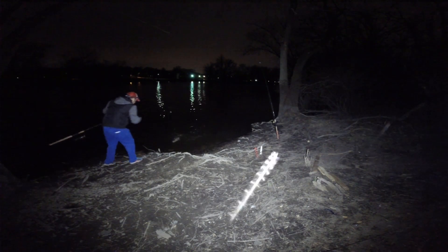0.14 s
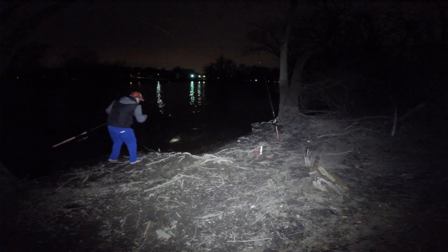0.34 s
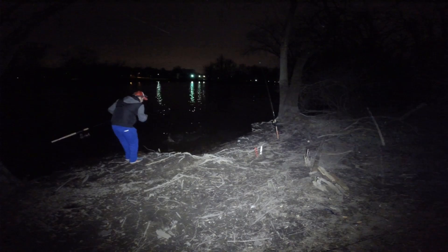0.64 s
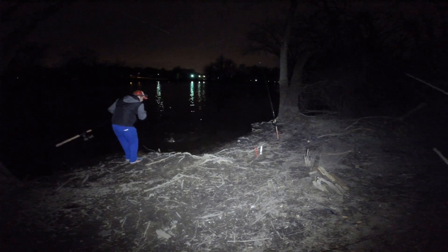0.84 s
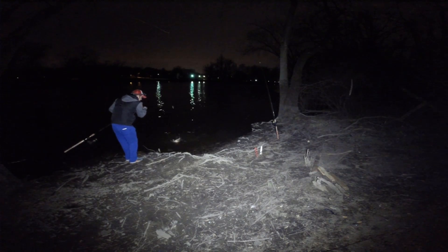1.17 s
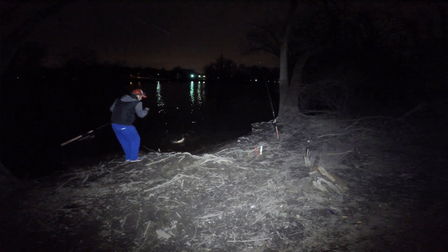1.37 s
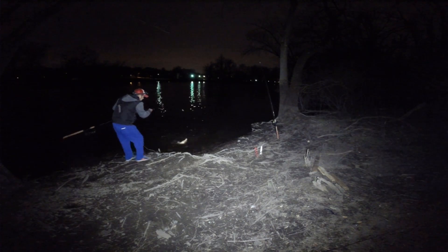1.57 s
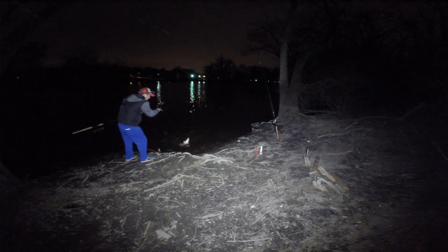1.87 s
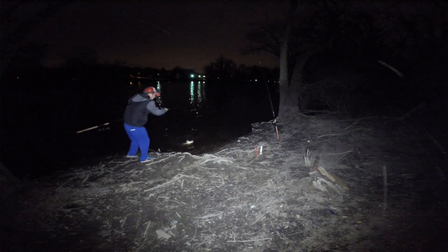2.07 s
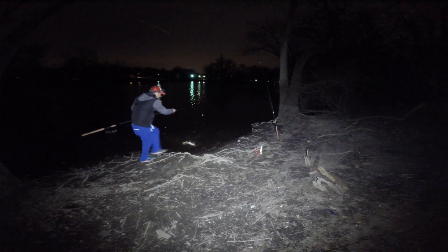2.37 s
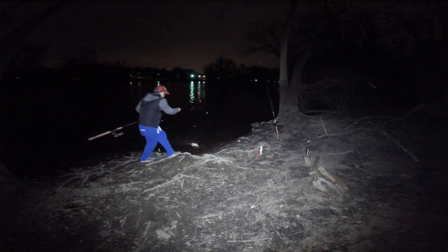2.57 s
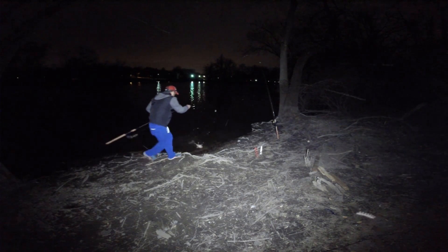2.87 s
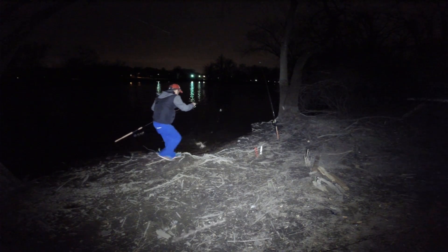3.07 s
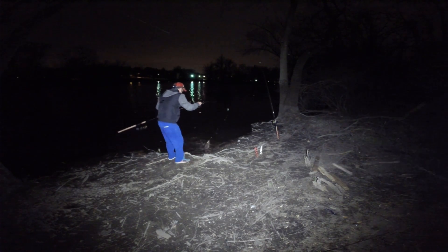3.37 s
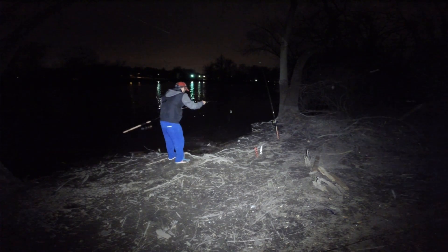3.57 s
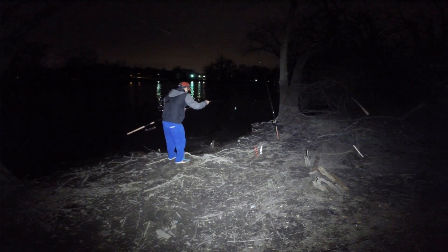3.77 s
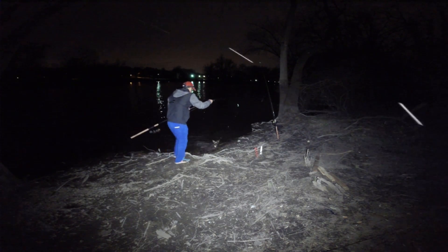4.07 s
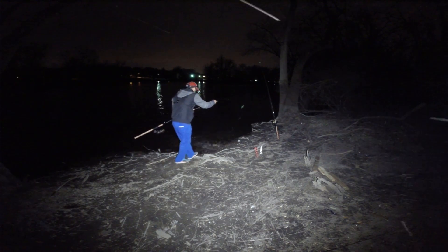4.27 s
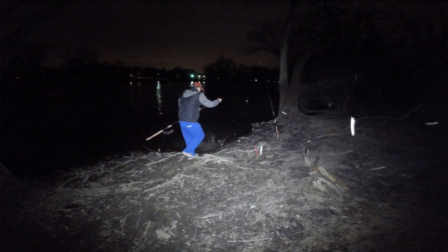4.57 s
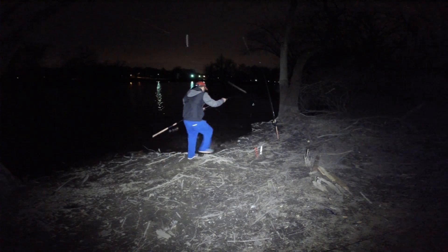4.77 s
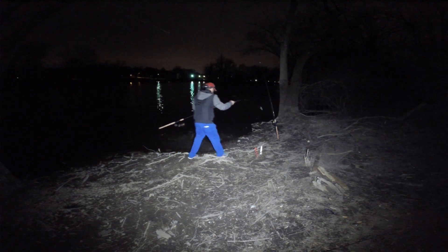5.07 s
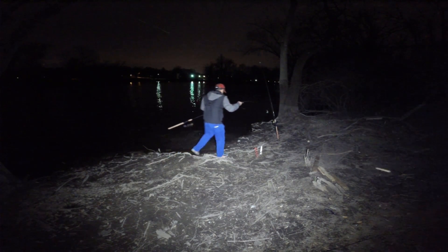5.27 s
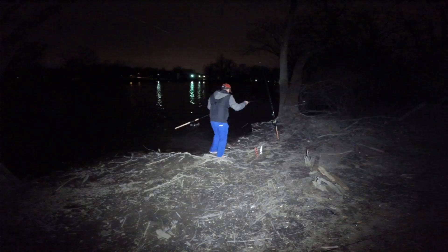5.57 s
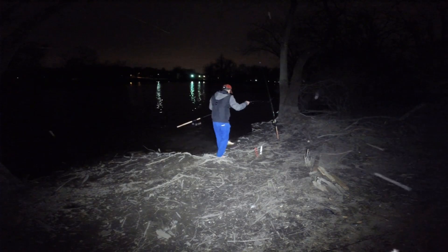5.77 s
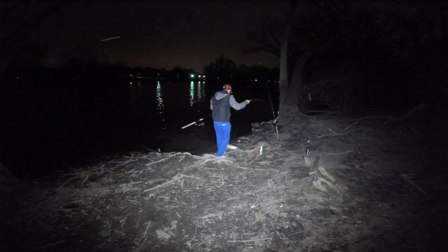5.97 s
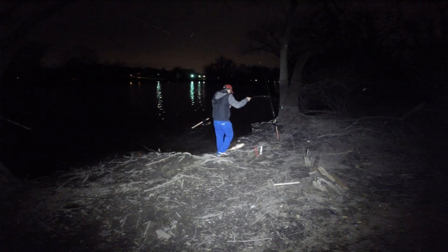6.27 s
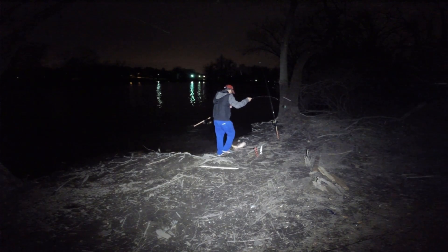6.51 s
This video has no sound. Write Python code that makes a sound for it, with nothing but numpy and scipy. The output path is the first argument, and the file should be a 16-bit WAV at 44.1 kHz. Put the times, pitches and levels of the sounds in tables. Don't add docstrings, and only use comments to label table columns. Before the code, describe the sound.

Feet rustle and crunch through dry brush on a quiet night riverbank, twigs snapping harder later while a tiny tackle bell jingles over distant traffic hum.

```python
import sys
import numpy as np
from scipy import signal
from scipy.io import wavfile
from scipy.ndimage import uniform_filter1d

SR = 44100
rng = np.random.default_rng(int(sys.argv[2]) if len(sys.argv) > 2 else 0)


def dump_mix(stems):
    frames = np.atleast_2d(stems).T
    limited = np.clip(frames, -1, 1)
    pcm = np.round(limited * 32767).astype(np.int16)
    wavfile.write(sys.argv[1], SR, pcm)


def volts_from_decibels(level):
    exponent = np.asarray(level, float) / 20
    return 10 ** exponent


N = 292824

# (frequency [Hz], level [dB])
FIBRE_COLOUR = [(530, -27.5), (900, -8), (1480, -15.5), (1840, -7.5), (2390, -13), (2800, -16.5),
                (3250, -27), (3620, -26), (4030, -9.5), (4380, -18), (4760, -13.5), (6120, -15),
                (7230, -24.5), (10600, -16), (12800, -35), (14800, -46), (15500, -24.5)]


def evened(x):
    return x / np.sqrt(np.mean(x ** 2) + 1e-20)


def peaked(x, db):
    return volts_from_decibels(db) * x / (abs(x).max() + 1e-20)


def read(points, hz):
    f, value = np.transpose(points)
    return np.interp(np.log(hz + 1), np.log(f + 1), value)


def curve(rows, column):
    rows = np.array(rows)
    return np.interp(np.arange(N) / SR, rows[:, 0], rows[:, column])


def add(mix, s, sound):
    part = mix[round(s * SR):][:len(sound)]
    part += sound[:len(part)]


def smoothed(x, rows, columns):
    return uniform_filter1d(uniform_filter1d(x, size=rows, axis=0), size=columns, axis=1)


def resonate(x, hz, width):
    return signal.lfilter(*signal.iirpeak(hz, hz / width, SR), x)


def rings(x, modes):
    return sum(volts_from_decibels(db) * resonate(x, hz, width) for hz, width, db in modes)


def coloured(x, spectrum):
    hz = abs(np.fft.fftfreq(4096, 1 / SR))
    log_gain = np.log(volts_from_decibels(np.maximum(read(spectrum, hz), -100)))
    taps = np.fft.ifft(np.exp(np.conj(signal.hilbert(log_gain)))).real[:2048]
    return signal.oaconvolve(x, taps)[:len(x)]


def grains(per_s, spread_db):
    size = volts_from_decibels(spread_db * np.minimum(rng.exponential(1, N), 5)) * rng.choice([-1, 1], N)
    return evened(size * (rng.random(N) < per_s / SR))


def burst(ms, rise, count):
    u = np.arange(count) / SR * 1000 / np.clip(ms, .3, 40)
    return u ** rise * np.exp(-u * 2)


def night_air(spectrum, level_db, patchy_db, flicker_db):
    frames, hz = N // 256 + 5, np.fft.rfftfreq(1024, 1 / SR)
    a, b, patches = rng.standard_normal((frames, 513, 3)).T
    patches = evened(smoothed(patches, 8, 8))
    flicker = evened(uniform_filter1d(rng.standard_normal(frames), size=6))
    gain_db = read(spectrum, hz)[:, None] + patchy_db * patches + flicker_db * flicker
    z = (a + 1j * b) * volts_from_decibels(gain_db)
    return volts_from_decibels(level_db) * evened(signal.istft(z, nperseg=1024, noverlap=768)[1][:N])


def traffic_hum():
    # (frequency [Hz], level [dB])
    hum_colour = [(8.8, -29), (15, -17), (27, -17), (64, 3.5), (107, -1), (135, -9.5), (191, -3.5),
                  (281, -7), (421, -10), (454, -10), (655, -1.5), (764, -15.5), (875, -19), (1290, -28),
                  (1500, -71), (1950, -73), (3300, -120)]
    return night_air(hum_colour, level_db=-50, patchy_db=0.32, flicker_db=-0.5)


def air_hiss():
    # (frequency [Hz], level [dB])
    hiss_colour = [(710, -5.5), (1200, -1), (1500, 0.5), (1940, -1.5), (3200, -7.5), (3730, -8.5),
                   (5200, -19), (5600, -11.5), (5970, -18.5), (7320, -15), (8230, -38), (8870, -29),
                   (11500, -29), (12000, -26), (13200, -22), (15500, -55)]
    return night_air(hiss_colour, level_db=-67, patchy_db=2.0, flicker_db=1.0)


def insects():
    # (frequency [Hz], width [Hz], level [dB])
    buzz_bands = [(2650, 360, 7.5), (8170, 430, 6), (9840, 510, 1.5), (11300, 450, 2)]
    # (time [s], level [dB])
    buzz_level = [
        (0, -72),
        (.395, -71),
        (.41, -78.5),
        (1.5, -78.5),
        (6.64, -78.5),
    ]
    buzz = evened(rings(rng.standard_normal(N), buzz_bands))
    return volts_from_decibels(curve(buzz_level, column=1)) * buzz


def whine():
    # (frequency [Hz], level [dB])
    tones = [(5610.6, -78), (11245, -82.5)]
    frame_hz, first_frame_s = 23.977, .0073
    t = np.arange(N) / SR
    place = ((t - first_frame_s) * frame_hz) % 1
    swell = np.clip((place - .62) / 0.15, 0, 1) * np.clip((1 - place) / 0.037, 0, 1)
    drift = 0.008 * np.cumsum(rng.standard_normal(N))
    both = sum(volts_from_decibels(db + 8.5) * np.sin(2 * np.pi * hz * t + (k + 1) * drift)
               for k, (hz, db) in enumerate(tones))
    return swell * both


def shaking_db():
    # (start [s], hold [s], level [dB])
    jolts = [(0.415, 0.073, -66), (0.576, 0.013, -78), (0.826, 0.03, -56), (0.953, .02, -68),
             (1.02, 0.018, -67), (1.154, 0.12, -68.5), (1.277, 0.092, -61), (1.373, 0.19, -64),
             (1.516, 0.092, -67), (1.657, 0.033, -58), (1.853, 0.022, -64.5), (2.413, 0.037, -74),
             (2.55, 0.13, -71), (2.752, 0.06, -65), (3.124, 0.022, -61), (3.235, 0.066, -59),
             (3.387, .3, -65), (3.785, 0.1, -55), (3.929, 0.079, -49), (4.085, 0.025, -60),
             (4.185, 0.085, -55), (4.393, 0.13, -50.5), (4.58, 0.25, -57.5), (4.907, 0.17, -52.5),
             (5.06, 0.51, -56.5), (5.695, 0.037, -52), (5.815, 0.0088, -55), (5.894, 0.18, -59.5),
             (6.181, 0.12, -47), (6.362, 0.25, -51.5)]
    still_db, rise_db_per_s, fall_db_per_s = -83, 700, 291
    t = np.arange(N) / SR
    coarse = t[::64]
    start, hold, db = np.transpose(jolts)[:, :, None]
    rise = rise_db_per_s * np.maximum(start - coarse, 0)
    fall = fall_db_per_s * np.maximum(coarse - start - hold, 0)
    strongest = (db - rise - fall).max(axis=0)
    return np.interp(t, coarse, np.maximum(strongest, still_db))


def scratches(hz, width):
    puffs = signal.oaconvolve(abs(grains(200, 3)), burst(2.2, rise=0.5, count=1500))[:N]
    puffs = puffs * rng.standard_normal(N)
    return evened(resonate(resonate(puffs, hz, width), hz, width))


def brush():
    # (time [s], dry rustle level [dB], low crunch level [dB])
    tread = [(0.0, -63.5, -55.5), (0.41, -68.5, -49.5), (1.1, -68, -54), (1.4, -67.5, -46), (1.8, -68, -55),
             (2.94, -67, -51), (3.5, -65, -49.5), (4.15, -64, -50.5), (4.33, -60, -50.5),
             (4.46, -56.5, -45), (4.75, -61, -56.5), (5.1, -60.5, -52), (5.4, -67.5, -50),
             (5.86, -67.5, -54), (6.45, -59.5, -51), (6.64, -63.5, -48.5)]
    # (frequency [Hz], level [dB])
    crunch_colour = [(88, -60.5), (150, -5), (294, -10.5), (526, -3.5), (690, 3.5), (796, -5), (905, -6.5),
                     (1100, -16), (1390, -24), (2130, -20), (3300, -42), (4290, -89), (7260, -120)]
    # (frequency [Hz], width [Hz], level [dB])
    stalks = [(4290, 610, 1.5), (4570, 410, -0.5), (5080, 420, -0.5)]
    # (frequency [Hz], level [dB])
    dust_colour = [(5000, -29), (6500, -2), (7500, -14), (9000, 0), (11000, -5), (13000, -11), (15500, -18)]
    clumps = volts_from_decibels(2.0 * evened(uniform_filter1d(rng.standard_normal(N), size=600)))
    rustle = evened(coloured(grains(3000, 2.6) * clumps, FIBRE_COLOUR))
    crunch = evened(coloured(grains(900, 0.78) * clumps, crunch_colour))
    scratch = sum(volts_from_decibels(db) * scratches(hz, width) for hz, width, db in stalks)
    fizz = evened(coloured(grains(3000, 2.5) * clumps, dust_colour))
    rustle_db, crunch_db = curve(tread, column=1), curve(tread, column=2)
    effort_db = 0.5 * shaking_db() + 0.8 * rustle_db
    return (volts_from_decibels(rustle_db - 3.5) * rustle + volts_from_decibels(crunch_db - 6.5) * crunch
            + volts_from_decibels(1.197 * effort_db + 24) * scratch + volts_from_decibels(1.36 * rustle_db + 12.5) * fizz)


def housing_knocks():
    # (time [s], level [dB], frequency [Hz], length [ms])
    knocks = [(0.41, -40, 557, 5.5), (0.584, -46, 687, 4.9), (0.607, -40, 677, 5), (1.299, -44.5, 730, 5.2),
              (2.141, -44, 750, 2.2), (2.043, -40.5, 650, 5), (0.085, -44, 670, 7.6),
              (2.734, -40, 646, 1.2), (3.088, -45.5, 594, 3), (3.283, -38.5, 594, 6.7),
              (3.444, -35.5, 530, 2.4), (3.504, -38, 610, 4.8), (3.532, -43, 641, 10),
              (3.972, -35.5, 513, 7.5), (3.9847, -26.5, 582, 4.8), (3.996, -40, 672, 5.1),
              (4.014, -40, 670, 5.8), (4.03, -28.5, 596, 1.8), (4.062, -41.5, 650, 1.5),
              (4.401, -39.5, 670, 1), (4.439, -36.5, 654, 4.1), (4.455, -36.5, 586, 7.3),
              (4.486, -31.5, 537, 3.7), (4.5, -31, 668, 4.7), (4.5167, -25.5, 670, 0.35),
              (4.845, -35, 592, 2.3), (4.858, -33, 664, 0.44), (4.868, -23, 662, 0.78),
              (4.9988, -23, 572, 0.83), (5.0035, -19.5, 639, 0.98), (5.3082, -40, 273, 2.1),
              (5.3098, -14.5, 655, 0.74), (6.19, -22, 574, 0.64)]
    # (frequency [Hz], width [Hz], level [dB])
    side_rings = [(392, 80, -7), (580, 60, -10), (640, 55, 5), (760, 120, -8)]
    out, t = np.zeros(N), np.arange(3000) / SR
    for (s, db, hz, ms), noise in zip(knocks, rng.standard_normal((len(knocks), 3000))):
        push = burst(ms, rise=0.84 + ms / 4, count=3000)
        knock = evened(resonate(push * np.sin(2 * np.pi * hz * t), hz, 114))
        knock = evened(resonate(knock, 370, 910))
        sides = rings((push + 0.08 * np.exp(-t / 0.006)) * noise, side_rings)
        sides = evened(resonate(resonate(sides, 480, 880), 414, 760))
        thump = evened(resonate(push, 252, 150))
        add(out, s, peaked(knock + 0.49 * sides + 0.25 / (1 + ms) * thump, db))
    return out


def twigs():
    # (time [s], level [dB], frequency [Hz])
    split_twigs = [(0.323, -50, 1060), (0.399, -51, 1920), (0.584, -51, 1740), (1.45, -60, 1360),
                   (1.3, -49, 1050), (1.325, -57, 2050), (2.142, -46.5, 950), (2.517, -52.5, 2200),
                   (2.521, -46.5, 1270), (2.618, -51, 1260), (3.088, -47.5, 1260), (1.095, -54.5, 1820),
                   (3.932, -43.5, 1040), (3.972, -43, 1600), (4.014, -46.5, 1570), (4.03, -34.5, 1480),
                   (4.261, -48, 2240), (4.401, -42, 1120), (4.437, -40, 940), (4.5, -51, 1100),
                   (4.516, -35.5, 1060), (4.67, -52, 1540), (4.8412, -46, 1900), (4.847, -39, 1960),
                   (4.847, -44, 2700), (4.863, -34, 2030), (4.862, -46, 2620), (4.901, -51, 1890),
                   (4.8696, -25.5, 1040), (4.973, -59, 1890), (4.998, -34, 1010), (4.9992, -35.5, 1760),
                   (5.3085, -28.5, 945), (5.309, -35, 1980), (5.3123, -37, 2700), (6.1894, -43, 1150),
                   (6.189, -30, 1870), (6.478, -53.5, 2180)]
    # (time [s], level [dB], frequency [Hz])
    small_stems = [(0.511, -58, 1850), (0.698, -56, 1700), (0.7312, -56, 1740), (1.221, -60, 1200),
                   (1.305, -50, 1290), (1.4047, -65, 1270), (1.5084, -64, 1580), (2.7334, -62, 2100),
                   (2.8868, -66, 1760), (2.9941, -59, 1170), (3.4501, -55, 2200), (3.5349, -57, 2040),
                   (3.563, -53, 1140), (3.7, -65, 1090), (3.7898, -55, 1140), (5.882, -58, 1090),
                   (6.126, -55, 2260), (6.341, -62, 2080), (6.3649, -51, 2070), (6.5852, -55, 1110)]
    # (time [s], level [dB], frequency [Hz])
    thick_stems = [
        (1.235, -50, 990),
        (1.388, -55, 850),
        (1.466, -58, 910),
        (1.526, -48, 910),
        (2.549, -48, 880),
        (6.163, -53, 910),
    ]
    splits = split_twigs + small_stems + thick_stems
    out, t = np.zeros(N), np.arange(3000) / SR
    for (s, db, hz), noise in zip(splits, rng.standard_normal((len(splits), 3000))):
        ms = 1.9 - .055 * (db + 48.5)
        split = burst(ms, rise=0.91, count=3000) * (noise + 2.3 * np.sin(2 * np.pi * hz * t))
        wood = evened(resonate(resonate(split, hz, 0.31 * hz), hz, 0.11 * hz))
        bark = resonate(split, 1930, 800) + 0.59 * resonate(split, 1150, 800)
        bark = evened(resonate(bark, 1730, 4100))
        bark_db = 2.5 - 0.19 * (db + 42)
        add(out, s, peaked(wood + volts_from_decibels(bark_db) * bark, db + 1.0))
    return out


def upper_rings(strokes, modes, hz):
    out = np.zeros(N)
    for (s, db), noise in zip(strokes, rng.standard_normal((len(strokes), 4000))):
        rattle = noise * burst(5.0, rise=0.18, count=4000)
        add(out, s, peaked(resonate(rings(rattle, modes), hz, 2500), db - 3.0))
    return out


def bell():
    # (time [s], ring level [dB], ring frequency [Hz], tick level [dB])
    clapper_strokes = [(0.468, -45, 4100, -58), (0.4875, -44, 4140, -52), (0.835, -47, 4140, -59),
                       (1.0213, -49.5, 4200, -68), (1.1453, -52, 4060, -50), (1.278, -46, 4060, -52),
                       (1.308, -42, 4180, -52), (1.386, -46, 4070, -58), (1.441, -41, 4040, -54),
                       (1.5247, -47, 4100, -56), (1.6765, -42, 4100, -56), (2.409, -50.5, 4150, -54),
                       (2.445, -56, 4130, -65), (2.571, -46, 4070, -69), (2.615, -64, 4050, -64),
                       (2.651, -54, 4140, -54), (2.68, -63, 4120, -62), (3.1107, -43, 4160, -68),
                       (3.223, -40, 4100, -52), (3.271, -59, 4000, -58), (3.32, -60, 4000, -60),
                       (3.401, -59, 4080, -58), (3.468, -60, 4060, -60), (3.5945, -45, 4180, -52),
                       (3.881, -70, 4080, -49), (3.942, -46, 4080, -49), (3.989, -38, 3960, -57),
                       (4.0821, -37.5, 4090, -57), (4.2645, -46, 4030, -54), (4.4038, -38, 4070, -59),
                       (4.453, -34.5, 4050, -40), (4.614, -41, 4000, -45), (4.9762, -40, 3920, -39),
                       (5.687, -50, 3910, -65), (6.1454, -41, 4200, -45), (6.243, -35, 3950, -58),
                       (6.279, -42.5, 4120, -45),
                       (0.415, -63, 4110, -67), (0.5143, -50, 4100, -62), (0.5831, -53, 4100, -58),
                    (0.8021, -63, 4060, -63), (0.9552, -58, 4030, -61), (1.1085, -54, 4000, -58),
                    (1.178, -61, 4200, -55), (1.5973, -60, 4000, -61), (1.6492, -63, 4020, -58),
                    (2.544, -52, 4170, -61), (2.7626, -61, 4020, -60), (2.8005, -56, 4120, -60),
                    (3.7199, -47, 4150, -58), (3.7713, -49, 4200, -60), (3.8277, -44, 3970, -55),
                    (4.117, -42, 4130, -60), (4.187, -45, 4100, -60), (4.3266, -50, 4130, -53),
                    (4.4997, -42, 3930, -58), (4.7097, -46, 4090, -58), (4.7712, -49, 4160, -54),
                    (4.803, -41, 4060, -60), (4.8336, -38, 4270, -60), (4.9092, -49, 4000, -58),
                    (4.9584, -42, 4000, -56), (5.0535, -46, 4130, -58), (5.093, -45, 4090, -54),
                    (5.1188, -45, 4220, -58), (5.1726, -44, 4030, -54), (5.2643, -44, 3990, -54),
                    (5.3254, -43, 3960, -52), (5.395, -43, 4170, -48), (5.464, -45, 4000, -56),
                    (5.519, -58, 4040, -54), (5.7663, -49, 4090, -62), (5.815, -46, 3900, -49),
                    (5.9106, -43, 4040, -53), (5.9454, -47, 4120, -50), (6.0626, -57, 3880, -58),
                    (6.356, -55, 4190, -60), (6.3977, -44, 3920, -58), (6.4423, -67, 4040, -58),
                    (6.4774, -42, 3880, -60), (6.556, -58, 3900, -49)]
    # (frequency [Hz], width [Hz], level [dB])
    upper_tones = [(9215, 40, 5), (9470, 48, 2), (10810, 44, 4)]
    # (time [s], level [dB])
    second_strokes = [(0.5132, -65), (0.8046, -63), (0.8355, -60), (1.1468, -59), (1.3823, -56),
                      (1.4775, -55), (1.5569, -55), (1.6766, -65), (2.4099, -60), (2.825, -57),
                      (3.1114, -58), (3.2266, -57), (3.713, -54), (4.1894, -73), (4.6154, -51),
                      (4.7037, -52), (4.7706, -59), (5.3697, -59), (5.4585, -63), (6.2876, -50),
                      (6.355, -45), (6.4976, -51)]
    # (time [s], level [dB])
    third_strokes = [(0.8006, -56), (0.834, -61), (1.1448, -59), (1.4341, -57), (1.4586, -62),
                     (1.5339, -54), (1.6761, -58), (1.8572, -57), (2.4094, -60), (3.5952, -56),
                     (3.7823, -62), (3.8994, -72), (4.6458, -54), (4.7666, -59), (4.9551, -52),
                     (6.2417, -44), (6.2866, -76), (6.5585, -47)]
    strokes = clapper_strokes
    out = np.zeros(N)
    for (s, ring_db, hz, tick_db), noise in zip(strokes, rng.standard_normal((len(strokes), 4000))):
        tick = noise * burst(2.5, rise=0.67, count=4000)
        tick = resonate(resonate(resonate(tick, 5230, 700), 4900, 900), 4300, 1600)
        rattle = noise * burst(8.1, rise=0.29, count=4000)
        ring = resonate(rattle, hz, max(ring_db + 76, 22))
        ring = resonate(ring + 0.2 * resonate(rattle, hz + 130, 110), hz, 450)
        add(out, s, peaked(ring, ring_db - 7.5) + peaked(tick, tick_db))
    shake, other = grains(110, 2.4), grains(60, 2.8)
    low = evened(resonate(resonate(shake, 4060, 22) + 0.6 * resonate(other, 4120, 26), 4080, 400))
    taps = evened(resonate(resonate(shake, 5700, 1000), 3400, 1300))
    high = evened(sum(rings(grains(50, 2.6), [mode]) for mode in upper_tones))
    upper = upper_rings(second_strokes, upper_tones[:2], 8000)
    upper = upper + upper_rings(third_strokes, upper_tones[2:], 9600)
    level_db = shaking_db()
    shimmer = volts_from_decibels(0.74 * level_db - 22.5) * low + volts_from_decibels(level_db - 22) * taps + volts_from_decibels(0.56 * level_db - 44) * high
    return out + upper + shimmer


def cracks():
    # (time [s], level [dB], length [ms], brightness [dB per octave])
    bright_cracks = [(1.309, -43, 2.9, -4), (3.568, -46, 2.5, 5), (3.712, -48, 4, 7),
                     (3.979, -41, 1.1, -15), (4.031, -31.5, 2.1, 1.5), (4.242, -39.5, 26.6, 1),
                     (4.344, -42, 11, -3.5), (4.361, -39.5, 4, -30), (4.375, -48, 3.6, 10),
                     (4.493, -36.5, 8.9, -4), (4.503, -40, 10, 3), (4.517, -25, 0.94, -3),
                     (4.5795, -30.5, 2.5, 5.5), (4.838, -37, 13, 1), (4.857, -33, 7.3, 0),
                     (4.8673, -30.5, 1.9, -4.5), (4.893, -33.5, 0.96, 0.5), (4.905, -38.5, 10.4, -28),
                     (4.971, -36.5, 12, -11), (4.999, -26, 3.8, 1.5), (5.05, -37, 7, -3.5),
                     (5.118, -40.5, 2.9, -29), (5.302, -44, 5, -20), (5.3085, -28, 4.4, 0.5),
                     (6.128, -47, 10, 1.5), (6.189, -35.5, 5.3, -5), (6.23, -39, 2.9, -9),
                     (6.304, -50, 2.7, -13), (6.353, -37, 9.3, -36), (6.395, -41, 6.9, -14),
                     (6.479, -42, 5.2, -30)]
    # (time [s], level [dB], length [ms], brightness [dB per octave])
    splinters = [(3.2819, -49, 1.5, 4), (3.618, -44, 1.2, -12), (3.682, -49, 1.5, 1), (3.7814, -54, 1.5, 5),
                 (3.877, -46, 1.5, 7), (4.2594, -49, 1.4, 4), (4.2914, -52, 1.5, 8), (4.3226, -50, 1.5, -2),
                 (4.464, -52, 1.5, 0.5), (4.645, -48, 1.5, -7), (4.7015, -50, 1.1, -2),
                 (4.7665, -51, 1.5, 0.5), (4.843, -42, 2.3, -5), (4.8883, -37, 1.5, -1),
                 (5.1624, -60, 1.5, 2), (5.2084, -55, 1.5, 3), (5.2254, -50, 1.5, 2), (5.285, -46, 3, -6),
                 (5.3706, -44, 1.4, 0.5), (5.3894, -50, 1.5, 5), (5.457, -50, 1.5, -7),
                 (5.5154, -56, 1.5, 2), (5.5448, -62, 1.7, -3), (5.6344, -52, 1.5, -10),
                 (5.8147, -51, 1.5, -1), (5.9449, -61, 1.4, 3), (6.0087, -58, 1.5, -8),
                 (6.036, -52, 1.5, 2), (6.2404, -40, 1.3, -12), (6.2863, -44, 1.7, 3),
                 (6.3365, -56, 1.5, 3), (6.462, -55, 1.3, 6), (6.553, -48, 1.2, -15)]
    breaks = bright_cracks + splinters
    out, t = np.zeros(N), np.arange(4000) / SR
    for (s, db, ms, tilt_db), noise in zip(breaks, rng.standard_normal((len(breaks), 4000))):
        spit = noise * burst(ms, rise=0.65 + ms / 30, count=4000)
        patter = 0.075 * noise[::-1] * np.exp(-t / 0.016)
        colour = [(hz, level + (tilt_db if hz > 4500 else -abs(tilt_db)) * abs(np.log2(hz / 4500)))
                  for hz, level in FIBRE_COLOUR]
        add(out, s, peaked(coloured(spit + patter, colour), db))
    return out


def scene():
    # (frequency [Hz], level [dB])
    port = [(2300, 2.5), (2900, -3), (3300, -1.5), (3700, -3), (3950, 1.5), (11000, -2.5), (13000, -3),
            (15000, -6)]
    air = traffic_hum() + air_hiss()
    near = coloured(brush() + housing_knocks() + twigs() + bell() + cracks(), port)
    return (air + insects() + whine() + near)[None]


def thinned(x, chance_db, lift_db, edge_hz):
    # (frequency [Hz], share lost [0-1])
    lost = [(12300, 0), (13000, .12), (13600, .25), (13900, .55), (15200, .62)]
    hz, _, z = signal.stft(x, SR, nperseg=1024, noverlap=768)
    level_db = 10 * np.log10(smoothed(abs(z) ** 2, 12, 6) + 1e-20)
    chance = evened(smoothed(rng.standard_normal(z.shape), 24, 8))
    order = np.argsort(level_db + chance_db * chance, axis=1)
    rank = np.argsort(order, axis=1) / z.shape[1]
    share = read(lost, hz)[:, None]
    z = z * (rank >= share) * volts_from_decibels(lift_db * share) * (hz[:, None] < edge_hz)
    return signal.istft(z, SR, nperseg=1024, noverlap=768)[1][:N]


def band_limit(x):
    return signal.sosfilt(signal.butter(12, 15630, fs=SR, output="sos"), x)


def record(dry):
    mix = thinned(dry[0], chance_db=6, lift_db=10.0, edge_hz=15130)[None]
    return band_limit(mix)


dry = scene()
out = record(dry)
dump_mix(out)
```